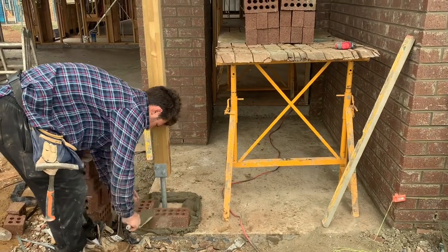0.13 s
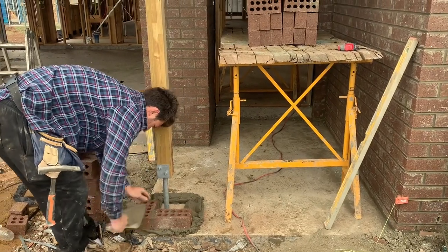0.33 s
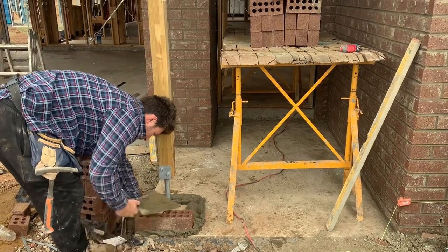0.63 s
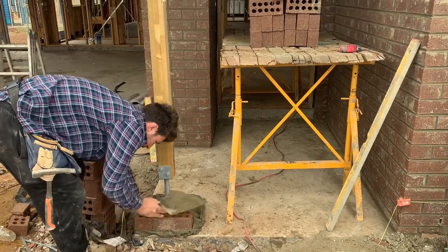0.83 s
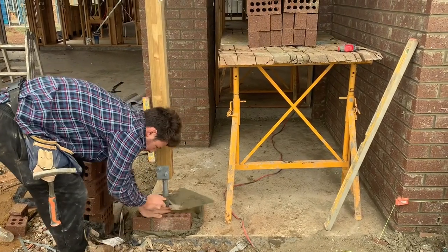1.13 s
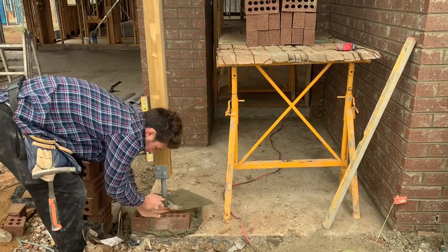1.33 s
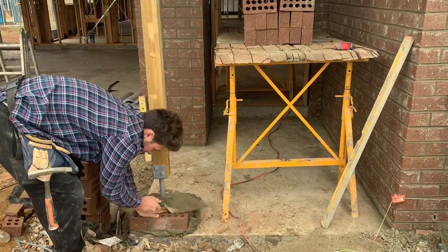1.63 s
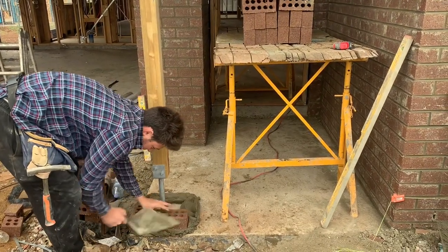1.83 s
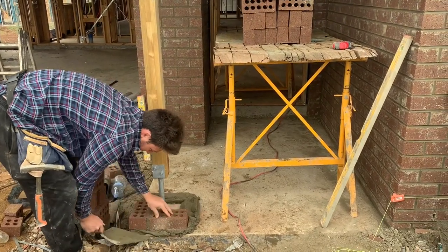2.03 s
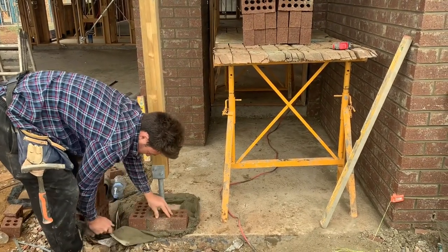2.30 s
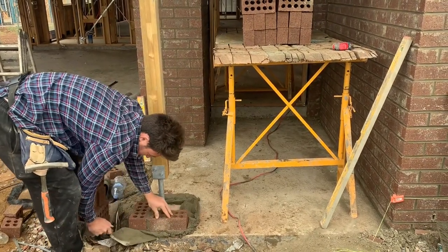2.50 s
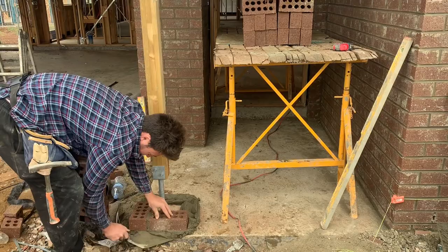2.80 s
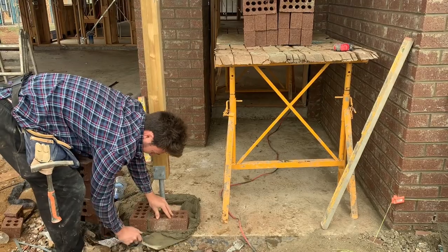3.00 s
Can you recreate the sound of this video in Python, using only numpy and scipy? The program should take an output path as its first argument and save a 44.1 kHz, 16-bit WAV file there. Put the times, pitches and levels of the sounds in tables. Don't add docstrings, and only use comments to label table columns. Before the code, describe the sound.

A steel trowel gives a brief gritty scrape, then four dull, clinking taps on a brick, a pause, and lighter scrapes. Close, left of the microphone, outdoors between brick walls, with faint rumble and distant machine whine.

```python
import sys
import numpy as np
from scipy import signal
from scipy.fft import rfft, irfft
from scipy.io import wavfile
from scipy.ndimage import uniform_filter1d

SR = 44100
rng = np.random.default_rng(int(sys.argv[2]) if len(sys.argv) > 2 else 0)


def master_out(mix):
    frames = np.transpose(np.atleast_2d(mix))
    ceiling = np.clip(frames, -1, 1)
    pcm = np.round(ceiling * 32767).astype(np.int16)
    wavfile.write(sys.argv[1], SR, pcm)


def to_linear_factor(level_db):
    exponent = np.asarray(level_db, float) / 20
    return 10 ** exponent


N = 138915


def evened(x):
    return x / np.sqrt(np.mean(x ** 2) + 1e-20)


def read(points, hz):
    f, value = np.transpose(points)
    return np.interp(np.log(hz + 1), np.log(f + 1), value)


def add(mix, start_s, sound):
    part = mix[round(start_s * SR):][:len(sound)]
    part += sound[:len(part)]


def shaped(x, gain):
    return irfft(rfft(x) * gain(np.fft.rfftfreq(x.shape[-1], 1 / SR)), x.shape[-1])


def resonate(x, hz, width_hz):
    r = np.exp(-np.pi * width_hz / SR)
    return signal.lfilter([1 - r, 0, r - 1], [1, -2 * r * np.cos(2 * np.pi * hz / SR), r * r], x)


def body(x, peaks, slip_db=0):
    slip_s = 0.008
    drift = rng.standard_normal((len(peaks) + 1, x.shape[-1]))
    drift = evened(uniform_filter1d(drift, round(slip_s * SR)))
    slip = to_linear_factor(slip_db * np.clip(.5 * drift[-1] + 1.2 * drift, -2, 2) / 2)
    total = 0
    for k, (hz, width_hz, db) in enumerate(peaks):
        ring = resonate(x * slip[k], hz, 1.65 * width_hz)
        ring = resonate(ring, hz, 1.65 * width_hz)
        total = total + (-1) ** k * to_linear_factor(db) * ring
    return evened(total)


def paired(length):
    share = 0.46
    noise = rng.standard_normal((3, length))
    return share * noise[0] + np.sqrt(1 - share ** 2) * noise[1:]


# [Hz, dB per Hz]
SITE_TONE = [(22, -40.5), (45, -8.5), (75, -13), (115, -11), (195, -12.5), (520, -23.5), (1120, -32.5),
             (3330, -52), (9180, -71.5)]
# [Hz, 0-1]
SITE_LIKENESS = [(40, 0.21), (120, 0.3), (250, 0.074), (1000, 0.058), (8000, 0.084)]
# [Hz, dB]
SITE_LEAN = [(60, 1), (250, 1.5), (1030, 6.5), (2100, 6.5), (4290, 1)]


def site():
    wash_db, patch_db, rumble_db, rumble_hz = -46.5 - 6.5, 0.45, -51, 51.4
    frames, hz = N // 256 + 5, np.fft.rfftfreq(1024, 1 / SR)
    a, b, c, d, patches = rng.standard_normal((frames, 513, 5)).T
    patches = uniform_filter1d(patches, 8, 0)
    patches = evened(uniform_filter1d(patches, 10, 1))

    same = np.clip(read(SITE_LIKENESS, hz), -1, 1)[:, None]
    left = a + 1j * b
    right = same * left + np.sqrt(1 - same ** 2) * (c + 1j * d)
    lean = np.outer([.5, -.5], read(SITE_LEAN, hz))[:, :, None]
    z = np.array([left, right])
    z *= to_linear_factor(read(SITE_TONE, hz)[:, None] + patch_db * patches + lean)
    wash = signal.istft(z, nperseg=1024, noverlap=768)[1][:, :N]

    noise = rng.standard_normal((2, N))
    rumble = resonate(noise[0] + 0.076 * noise, rumble_hz, 21)
    rumble = resonate(rumble, rumble_hz, 47)
    return to_linear_factor(wash_db) * evened(wash) + to_linear_factor(rumble_db) * evened(rumble)


# [s, dB, dB]
MACHINE_MOVES = [(0, -61.5, -62), (.42, -61, -60.5), (.58, -67.5, -74), (.66, -87, -81), (0.802, -80, -83),
                 (1.0, -68, -71), (1.299, -72, -71), (1.419, -83, -66.5), (1.7, -108, -80),
                 (2.4, -87, -78.5), (2.55, -70, -62.5), (2.75, -62.5, -66), (3.15, -61, -58)]
# [Hz, dB]
MACHINE_HISS = [(1500, -8), (2500, -3), (3000, -26.5), (5000, -16), (6000, -4.5), (7000, -1.5), (8300, -27)]


def machine():
    whine_hz, whine_width_hz = 4010, 400
    s, whine_db, hiss_db = np.transpose(MACHINE_MOVES)
    t = np.arange(N) / SR
    whine_noise, hiss_noise = rng.standard_normal((2, 2, N))
    whine = resonate(whine_noise, whine_hz, whine_width_hz)
    whine = evened(resonate(whine, whine_hz, whine_width_hz))
    hiss = evened(shaped(hiss_noise, lambda hz: to_linear_factor(read(MACHINE_HISS, hz)) * (hz > 1200)))
    return whine * to_linear_factor(np.interp(t, s, whine_db)) + hiss * to_linear_factor(np.interp(t, s, hiss_db))


# [s, s, dB, dB re level, dB re level]
STROKES = [(0, 0.019, -35, -3.5, -0.5), (0.024, 0.03, -41.5, -1, 6), (0.057, 0.027, -48.5, -8.5, 3),
           (0.37, 0.17, -54.5, -9.5, -11), (0.442, 0.071, -50.5, -10.5, -10), (2.004, 0.014, -57, -8.5, -6),
           (2.034, 0.12, -60, -8, -5.5), (2.128, 0.1, -53.5, -4, -4), (2.21, 0.033, -54, -7, -4),
           (2.233, 0.11, -62, -24, -36), (2.335, 0.015, -54.5, -9, -7), (2.455, 0.03, -60.5, -11, -13),
           (2.479, 0.092, -53.5, -6, -4.5), (2.563, 0.025, -53, -7, -17), (2.607, 0.088, -53.5, -4, -8),
           (2.698, 0.21, -54, -10.5, -10), (2.872, 0.046, -51.5, -6, -4.5), (2.94, 0.05, -56.5, -3.5, 3),
           (3.077, 0.015, -60.5, 4.5, -6), (3.105, 0.041, -59, 0.5, 4)]
# [Hz, Hz, dB]
BLADE_LOW = [(594, 104, -2.5), (743, 42, -0.5), (830, 104, -2), (978, 71, -6), (1209, 56, -5.5),
             (1670, 250, -13.5)]
BLADE_MID = [(2290, 170, 4.5), (2635, 110, -0.5), (3345, 620, -6), (4270, 710, -9)]
BLADE_HIGH = [(5430, 460, 1.5), (6350, 340, 4.5), (7020, 570, 6.5), (7980, 4500, -12)]


def strokes():
    grains_per_s, grain_spread_db, fall_s = 6000, 2, .012
    slip_db, treble_slip_db = 2, 2
    mortar = (320, 200, -3)
    grain_size = to_linear_factor(grain_spread_db * np.minimum(rng.exponential(1, (3, N)), 5))
    grit = grain_size * (rng.random((3, N)) < grains_per_s / SR)
    noise, t, push = paired(N), np.arange(N) / SR, np.zeros((3, N))
    for s, length, db, mid_db, grit_db in STROKES:
        rise_share = .55 if .2 < s < 1 else 0.2
        underway = s == 0
        rise = np.clip((t - s) / (rise_share * length) + underway, 0, 1)
        shape = rise * np.exp(-np.maximum(t - s - length * 0.72, 0) / fall_s)
        push += shape * to_linear_factor([[db], [db + mid_db], [db + grit_db]])
    low = body(grit[0] * noise[0], BLADE_LOW + [mortar], slip_db)
    mid = body(grit[1] * noise[0], BLADE_MID, slip_db)
    high = body(grit[2] * noise, BLADE_HIGH, treble_slip_db)
    return push[0] * low + push[1] * mid + push[2] * high


# [s, dB, Hz, dB re peak, dB re peak]
CATCHES = [(0.002,-31.5,824,-12,-9), (0.008,-34.5,790,-14,-4), (0.018,-35.5,806,-10,1), (0.031,-41,840,1,6),
           (0.034,-26.5,795,-13,-20.5), (0.058,-34,826,-25,-10.5), (0.063,-37,919,-24,-15),
           (0.071,-31.5,830,-31,-14), (0.078,-35.5,827,-18,-15), (2.009,-55,773,-12,-7),
           (2.057,-47.5,856,-18,-5), (2.073,-48,710,-24,-14), (2.146,-49,734,-13,-1),
           (2.169,-45.5,1004,-4,-26), (2.218,-41.5,706,-31,-9.5), (2.344,-44,860,-18,-13),
           (2.421,-44.5,880,-23.5,-32), (2.496,-50,753,0.5,-4), (2.523,-40,826,-11,-8),
           (2.572,-42.5,854,-17.5,-17), (2.614,-47,604,-8,2), (2.622,-44.5,730,-18,1),
           (2.642,-36.5,730,-11,-3.5), (2.650,-44.5,710,-17,-9), (2.678,-40,765,-31,-22),
           (2.732,-40.5,784,-17,-21), (2.737,-42,723,-13.5,-16), (2.761,-49,800,-22,-4),
           (2.869,-47,816,-2,-4), (2.88,-34.5,664,-25,-13), (2.894,-39,710,-15,-23),
           (2.909,-42,670,-10.5,-11), (2.950,-48,660,4.5,-18), (3.083,-43.5,748,-20,-16),
           (3.091,-47,640,-8,1), (3.108,-56.5,753,6,3), (3.146,-44.5,950,1,-2)]
# [s, Hz]
CATCH_MID = [(0, 2330), (2.55, 2300), (2.87, 2560), (3.15, 2520)]


def catches():
    low_t60_s, mid_t60_s, tick_t60_s, rise_s = 0.041, 0.034, 0.02, 0.0015
    mid_boost_db, tick_boost_db = 7, 4.5
    out, t = np.zeros((N, 2)), np.arange(3000) / SR
    treble = body(paired(N), BLADE_HIGH)
    for s, db, hz, mid_db, tick_db in CATCHES:
        turn, detune = rng.random(2), rng.uniform(-1.19, 1, 2)
        mid_hz = np.interp(s, *np.transpose(CATCH_MID)) * (1 + 0.024 * detune[0])
        partner_hz = (1 + 0.092 * detune[1]) * mid_hz
        low = np.sin(2 * np.pi * hz * t)
        low += .5 * np.sin(2 * np.pi * (0.856 * hz * t + turn[0]))
        mid = np.sin(2 * np.pi * mid_hz * t)
        mid += .5 * np.sin(2 * np.pi * (partner_hz * t + turn[1]))
        tick = np.roll(treble, -round(s * SR), axis=1)[:, :len(t)]
        knock = low * to_linear_factor(-60 * t / low_t60_s)
        knock = knock + mid * to_linear_factor(mid_boost_db + mid_db - 60 * t / mid_t60_s)
        knock = knock + tick * to_linear_factor(tick_boost_db + tick_db - 60 * t / tick_t60_s)
        add(out, s, (to_linear_factor(db) * np.minimum(t / rise_s, 1) * knock).T)
    return out.T


# [s, dB, s]
THUDS = [
    (.39, -45, .3),
    (.45, -40, .2),
    (.930, -36, .05),
    (1.020, -37, .055),
    (1.646, -41, .05),
]


def thuds():
    top_hz = 420
    out, t = np.zeros(N), np.arange(SR // 2) / SR
    for s, db, t60 in THUDS:
        noise = rng.standard_normal(len(t))
        puff = shaped(noise, lambda hz: (hz > 60) * np.exp(-(hz / top_hz) ** 2))
        shape = to_linear_factor(-60 * t / t60) * np.minimum(10 * t / t60, 1) ** 2
        evening = np.linalg.norm(shape) / np.linalg.norm(shape * puff)
        add(out, s, to_linear_factor(db) * shape * puff * evening)
    return out


# [s, dB, dB, dB, 0 flat 1 edge 2 heel]
TAPS = [
    (0.965, -34, 9, -1, 2),
    (1.144, -22.5, 4.5, -1.5, 0),
    (1.324, -22.5, 1.5, -1.5, 1),
    (1.483, -23.5, 6, -1, 2),
]
# [Hz, dB, s]
FLAT_RING = [(345, -7, .06), (688, -7, .2), (702, 0, .16), (872, -10, .14), (953, -4, .085),
             (1152, -5, .16), (1238, -6, .08), (1620, -14, .05), (2288, -14, .06), (2546, -15, .08)]
EDGE_RING = [(382, -1, .055), (682, -14, .2), (697, -12, .2), (791, -7, .1), (872, -3, .06), (953, -9, .15),
             (1152, -14, .1), (1593, -9, .06), (2290, -10, .05), (2546, -9, .075)]
HEEL_RING = [(382, -6, .07), (694, -8, .2), (781, -1, .062), (834, -8, .09), (958, -12, .12),
             (1152, -15, .12), (1238, -10, .12), (1650, -11, .07), (2400, -11, .045)]
# [Hz, dB]
CRACK = [(120, -29), (200, 1), (400, -3), (560, -18), (800, 3.5), (1300, -20.5), (2450, -13.5), (3200, -33)]
SIZZLE = [(2800, -40), (3500, -5), (4600, -11), (5400, -9), (6300, -1), (7000, -0.5), (7900, -7.5),
          (9000, -16.5)]


def taps():
    thump_hz, thump_t60_s, rise_s, wobble_db = 188, 0.059, 0.0019, 2.5
    crack_level_db, crack_t60_s = 3.5, .07
    sizzle_t60_s, snap_t60_s = 0.13, 0.011
    out, t = np.zeros((N, 2)), np.arange(SR // 2) / SR
    for s, db, thump_db, treble_db, spot in TAPS:
        modes = [FLAT_RING, EDGE_RING, HEEL_RING][round(spot)]
        hz, mode_db, t60 = np.transpose(modes)[:, :, None]
        wobble = uniform_filter1d(rng.standard_normal((len(hz), len(t))), size=700)
        wobble = evened(uniform_filter1d(wobble, size=700))
        ring_db = mode_db + wobble_db * wobble * np.minimum(20 * t, 1) - 60 * t / t60
        ring = (to_linear_factor(ring_db) * np.sin(2 * np.pi * hz * t)).sum(0)

        glide = 1 + .5 * np.exp(-t / 0.0089)
        thump = np.sin(2 * np.pi * thump_hz * t * glide) * to_linear_factor(thump_db - 60 * t / thump_t60_s)

        noise = paired(len(t))
        crack = evened(shaped(noise, lambda hz: to_linear_factor(read(CRACK, hz)) * (hz > 90) * (hz < 3500)))
        sizzle = evened(shaped(noise, lambda hz: to_linear_factor(read(SIZZLE, hz)) * (hz > 2000)))
        tail = to_linear_factor(treble_db - 8 - 60 * t / sizzle_t60_s)
        snap = to_linear_factor(treble_db + 0.5 - 60 * t / snap_t60_s)
        hit = ring + thump + to_linear_factor(crack_level_db - 60 * t / crack_t60_s) * crack
        hit += sizzle * (tail + snap)
        add(out, s, (to_linear_factor(db - 6.5) * np.minimum(t / rise_s, 1) * hit).T)
    return out.T


# [s, dB, Hz, Hz, s]
SQUEAL = (2.936, -56, 5550, 320, .3)


def squeal():
    s, db, hz, width_hz, t60 = SQUEAL
    t = np.arange(N) / SR - s
    fade = to_linear_factor(db - 60 * np.maximum(t, 0) / t60) * (t > 0)
    return fade * body(paired(N), [(hz, width_hz, 0)])


# [Hz, s]
WALLS = [(200, 0.37), (800, 0.4), (3000, 0.33), (7000, 0.18)]


def walls(x):
    slots = np.arange(120, SR // 2 - 20, 20)
    size = (2, len(slots))
    at = slots + rng.integers(0, 20, size)
    echoes = np.zeros((2, SR // 2))
    np.put_along_axis(echoes, at, rng.choice([-1., 1.], size), 1)
    hz, t, z = signal.stft(echoes, SR, nperseg=256)
    fade = to_linear_factor(-60 * t / read(WALLS, hz)[:, None])
    tail = signal.istft(z * fade, SR, nperseg=256)[1]
    return signal.fftconvolve(x[None], tail / np.linalg.norm(tail[0]), axes=1)[:, :N]


# [Hz, dB]
NEAR_SIDE = [(100, 1), (180, 1), (320, 4), (550, 10.5), (950, 13), (1660, 7), (2890, 5), (5020, 2),
             (7500, -2), (8700, -6)]
# [Hz, radians]
NEAR_LEAD = [(0, 0), (860, 7.0), (1120, 10.8), (2070, 14.2), (3960, 14.0), (4820, 14.0), (6800, 8.2),
             (8870, 9.5)]


def ports(x):
    def pair(hz):
        side = to_linear_factor(read(NEAR_SIDE, hz) / 2)
        lag = np.exp(-1j * np.interp(hz, *np.transpose(NEAR_LEAD)))
        return np.array([side, lag / side])
    return shaped(np.pad(x, ((0, 0), (0, 2049))), pair)[:, :N]


def scene():
    tap_wall_db, rub_wall_db = -13, -10.5
    background = site() + machine()
    rub = strokes() + catches() + squeal()
    hits = taps()
    echo = walls(to_linear_factor(tap_wall_db) * hits[0] + to_linear_factor(rub_wall_db) * rub[0])
    return ports(hits + rub + echo) + thuds() + background


def top_cut(x):
    return signal.sosfilt(signal.butter(12, 14450, fs=SR, output="sos"), x)


# [Hz, dB]
SELF_NOISE = [(10500, 0), (11200, -19), (12300, -25), (12700, -3.5)]


def record(dry):
    edge_hz, fall_db_per_khz, self_noise_db = 8000, 15, -80.5
    dull = shaped(dry, lambda hz: to_linear_factor(-fall_db_per_khz * np.clip(hz - edge_hz, 0, 2500) / 1000))
    noise = rng.standard_normal(dry.shape)
    hiss = shaped(noise, lambda hz: to_linear_factor(read(SELF_NOISE, hz)) * (hz > 7000))
    return top_cut(dull + to_linear_factor(self_noise_db) * hiss)


dry = scene()
out = record(dry)
master_out(out)
```